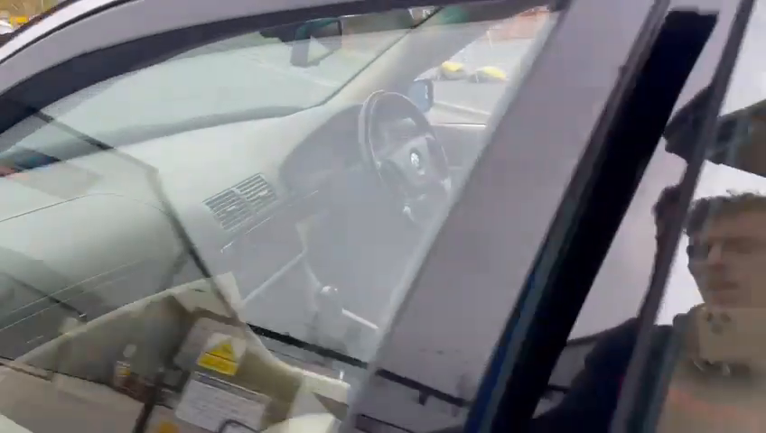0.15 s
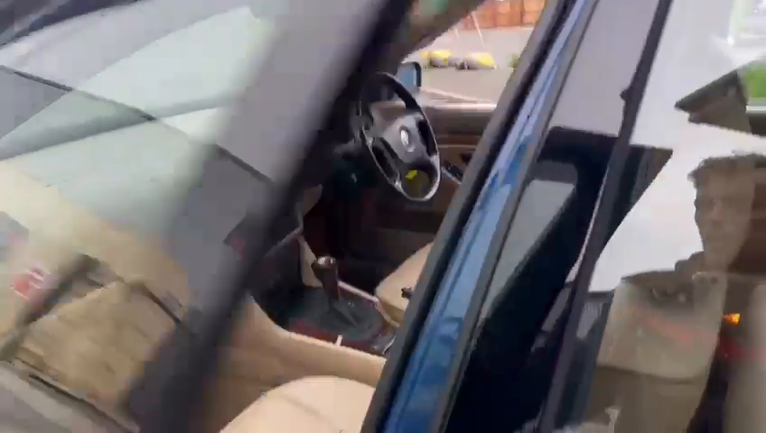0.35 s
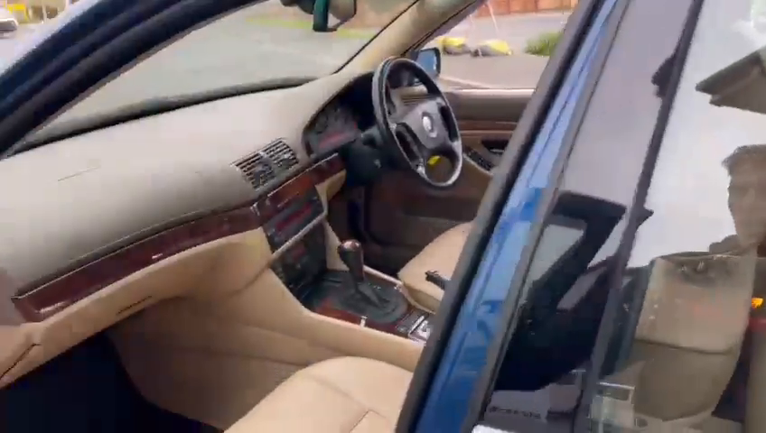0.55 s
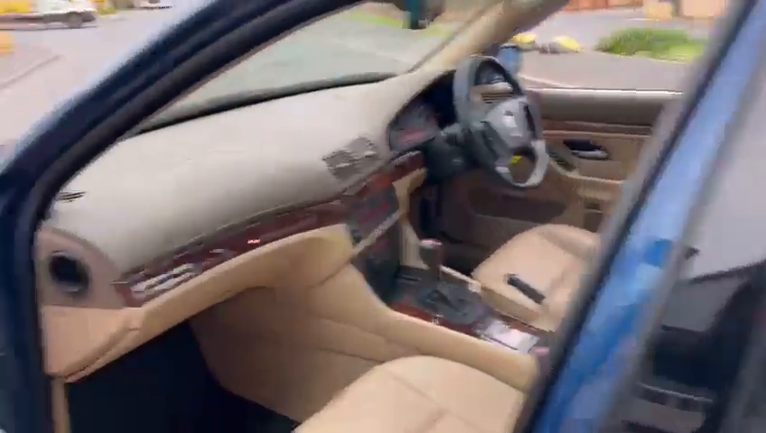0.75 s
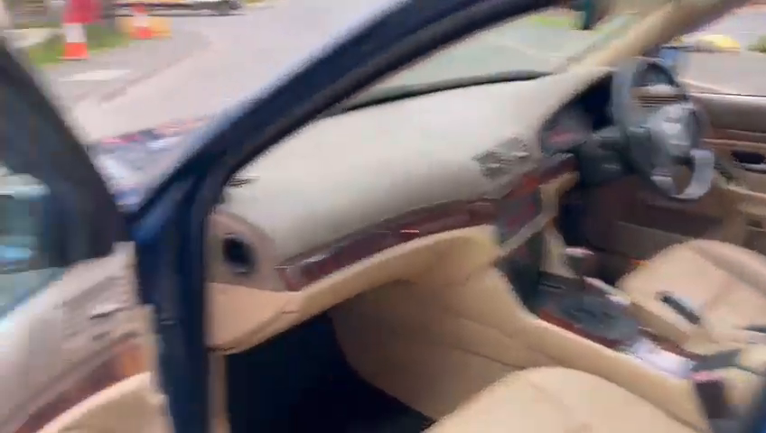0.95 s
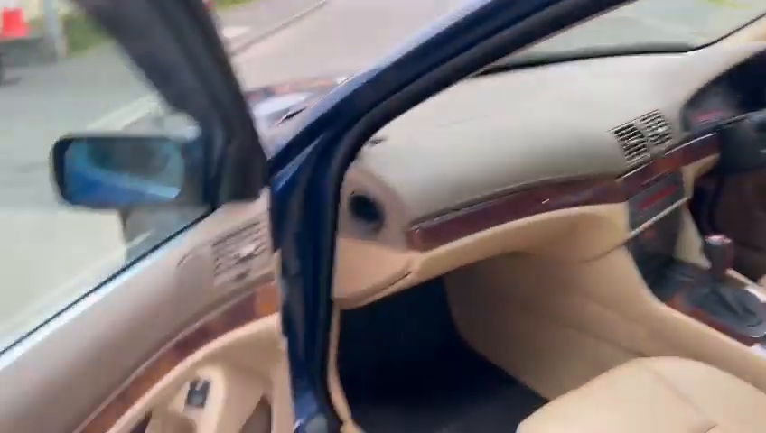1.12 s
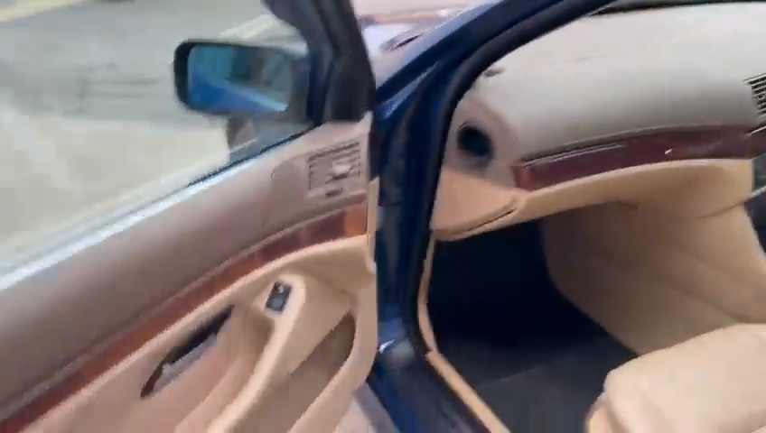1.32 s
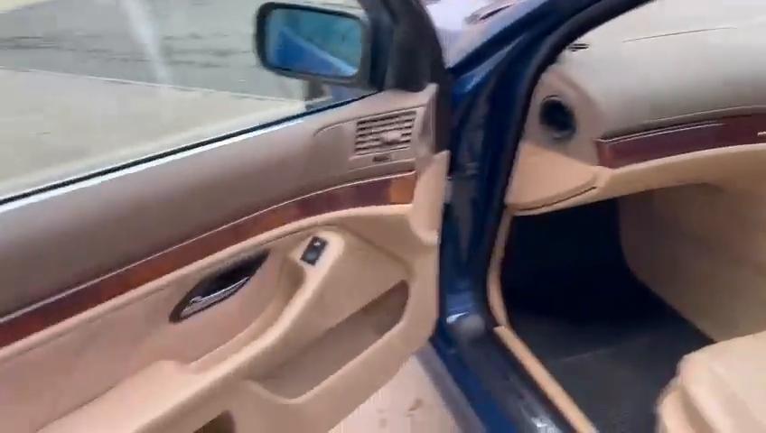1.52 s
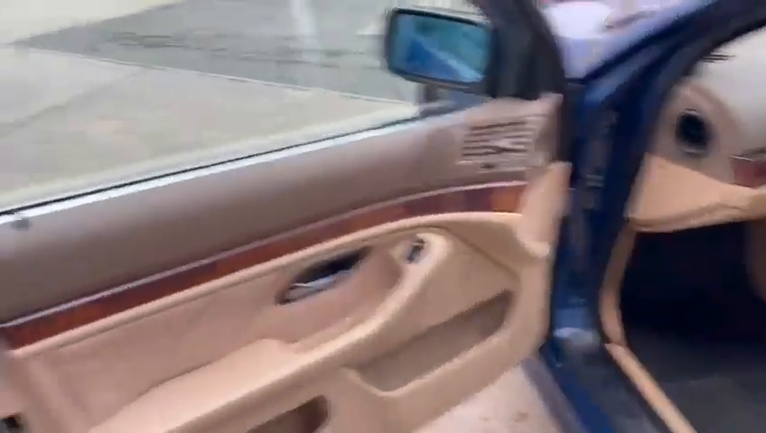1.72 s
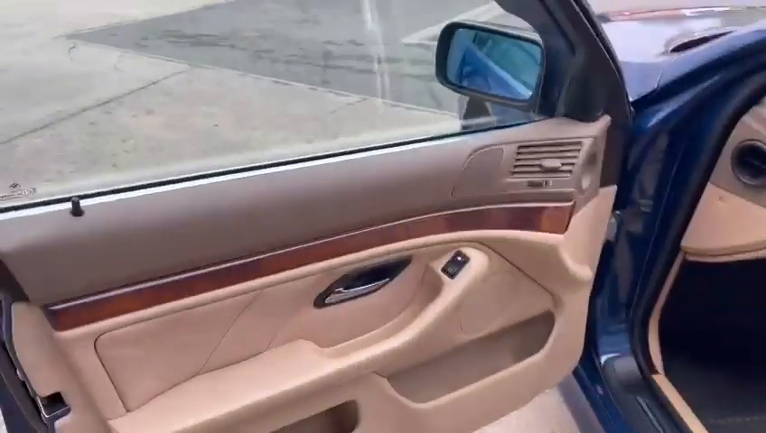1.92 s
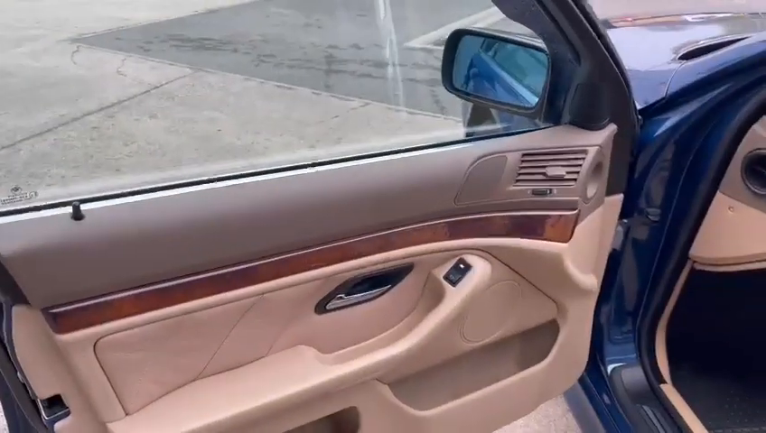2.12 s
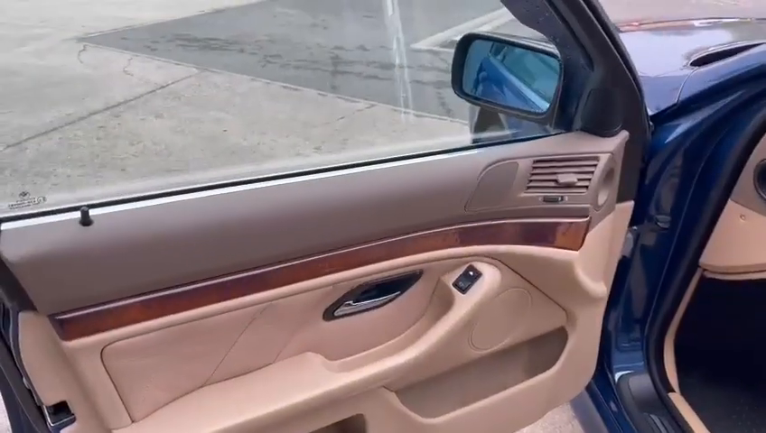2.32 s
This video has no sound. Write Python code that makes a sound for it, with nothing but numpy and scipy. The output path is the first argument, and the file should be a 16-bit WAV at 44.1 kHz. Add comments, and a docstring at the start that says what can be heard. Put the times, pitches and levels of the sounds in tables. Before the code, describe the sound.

A car door opens by hand, close up outdoors. At 0.0-0.15 s the handle clacks with a hollow plastic knock and the latch clicks. Dull low thumps and rumble crowd 0.2-0.5 s as seals peel. A sharp, bright metallic snap lands at 0.6 s, then movement fades. Faint traffic, hiss, weak hums and a barely audible thin tone at 1.05-1.6 s remain; a soft low bump near 1.7 s ends the swing.

```python
"""Car door opened by hand

Outdoors and close by, the handle clacks, the latch lets go, the seals peel off with dull thumps in the
door shell, the handle snaps back, and the door swings out to a soft stop. Struck parts are banks of
decaying modes; low noise follows the door's motion. Shaped noise gives distant traffic and hiss,
with wavering hums and a brief thin tone."""
import sys
import numpy as np
from scipy import signal
from scipy.fft import rfft, irfft
from scipy.io import wavfile
from scipy.ndimage import uniform_filter1d

SR = 44100
rng = np.random.default_rng(int(sys.argv[2]) if len(sys.argv) > 2 else 0)


def dump(signal):
    """Clip the signal to [-1, 1] and save it as 16-bit WAV at the path in sys.argv[1]."""
    limited = np.clip(np.atleast_2d(signal).T, -1, 1)
    pcm = np.round(limited * 32767).astype(np.int16)
    wavfile.write(sys.argv[1], SR, pcm)


N = 108662


def amp(db):
    """Turn decibels into an amplitude factor."""
    return 10 ** (np.asarray(db) / 20)


def rms_one(x):
    """Scale a signal to an rms of 1."""
    return x / np.sqrt(np.mean(x ** 2) + 1e-20)


def at_hz(points, hz):
    """Read a curve between its points, on a logarithmic pitch axis."""
    points_hz, values = np.array(points).T
    return np.interp(np.log(hz), np.log(points_hz), values)


def drift(rate_hz):
    """Slow random wander of rms 1: noise through two equal low-pass poles."""
    step, settle = 40, 2000  # samples per slow point, slow points dropped at the start
    pole = np.exp(-2 * np.pi * rate_hz * step / SR)
    noise = rng.standard_normal(N // step + settle + 2)
    slow = signal.lfilter([1], [1, -2 * pole, pole * pole], noise)[settle:]
    return np.interp(np.arange(N) / step, np.arange(len(slow)), rms_one(slow))


def ring(clicks, hz, t60):
    """One mode: a unit click starts a sine of height 1 that decays by 60 dB in t60 seconds."""
    radius = amp(-60 / (t60 * SR))
    turn = 2 * np.pi * hz / SR
    feedback = [1, -2 * radius * np.cos(turn), radius * radius]
    return signal.lfilter([0, np.sin(turn)], feedback, clicks + 1e-18)


def built_up_ring(clicks, hz, t60, build_s):
    """A soft blow: a first resonator swells the click, then the mode rings on."""
    soft_blow = ring(clicks, hz, build_s)
    return ring(soft_blow, hz, t60) * 14 / (build_s * SR)  # offsets the gain of the first resonator


def pitch_share(hz, centre_hz, spread_octaves):
    """Bell curve over pitch: how hard a blow drives a mode; the spread is two deviations."""
    return np.exp(-.5 * (np.log2(hz / centre_hz) / (.5 * spread_octaves)) ** 2)


def banded_noise(spectrum, patchy_db, rate_hz):
    """Stereo noise of rms 1 in quarter-octave bands, each with its own level, flicker and width."""
    # left-right likeness of the noise: (pitch [Hz], likeness [0 to 1])
    likeness_curve = [(60, 1), (130, 0.81), (260, 1), (550, 0.41), (1140, 0.45), (2380, 0.48), (4980, 0.79),
                      (10400, 0.42)]
    edges = 22 * 2 ** np.arange(0, 9.1, 1 / 4)
    white = rng.standard_normal((2, 2, N + 8000))  # neighbouring bands use different noise
    out = 0
    for k, (low, high) in enumerate(zip(edges, edges[1:])):
        band = signal.butter(2, [low, high], "band", fs=SR, output="sos")
        mid, side = signal.sosfilt(band, white[k % 2])[:, -N:]
        hz = np.sqrt(low * high)
        alike = np.clip(at_hz(likeness_curve, hz), -1, 1)
        gain = amp(at_hz(spectrum, hz) + patchy_db * drift(rate_hz))
        stereo = np.sqrt(1 + alike) * mid + np.sqrt(1 - alike) * side * [[1], [-1]]
        out = out + gain * stereo
    return rms_one(out)


def ports(x, lead):
    """A close source reaches two microphone ports with a phase lead that changes with pitch."""
    hz = np.fft.rfftfreq(N, 1 / SR) + 1
    turn = np.exp(.5j * at_hz(lead, hz))
    return irfft(rfft(x) * np.array([turn, 1 / turn]), N)


def street():
    """Distant traffic and microphone hiss: wide noise whose bands flicker independently."""
    # long-term colour of the background: (pitch [Hz], relative density [dB per Hz])
    street_tone = [(25, -25), (45, 13.5), (70, -56.5), (130, 0.5), (220, -4), (290, -6.5), (350, -4),
                   (480, -6), (600, -10), (800, -12), (1400, -16), (2100, -17.5), (3000, -21.5),
                   (3700, -29), (4200, -26.5), (6500, -23), (8500, -22), (9700, -8)]
    return amp(-40) * banded_noise(street_tone, patchy_db=2.0, rate_hz=16.3)


def tones():
    """Noise through paired resonators makes wavering hums; a sine fades in and out as a thin tone."""
    # wavering narrow bands: (pitch [Hz], nominal width [Hz], level [dB])
    hum_bands = [(286.2, 25, -50), (471.6, 4.5, -54.5), (3627, 450, -63)]
    whine_hz, whine_db, whine_start_s, whine_end_s = 2185, -59, 1.05, 1.6
    t = np.arange(N) / SR
    hums = 0
    for hz, width, db in hum_bands:
        t60 = 3.0 / width
        narrow = ring(ring(rng.standard_normal(N), hz, t60), hz, t60)
        hums = hums + amp(db) * rms_one(narrow)
    on = np.clip(np.minimum(t - whine_start_s, whine_end_s - t) / 0.007, 0, 1)  # 7 ms fades
    whine = amp(whine_db + drift(8.5)) * on * np.sin(2 * np.pi * whine_hz * t)
    return hums + whine


def rumble():
    """Low noise of the moving door and its peeling seals, its level following the motion."""
    # loudness of the movement: (time [s], level [dB])
    motion = [(0, -26), (0.101, -30.5), (0.182, -34), (.3, -21), (0.401, -27.5), (0.498, -29), (.58, -41.5),
              (0.658, -30.5), (.8, -41), (1.05, -54.5), (1.2, -54), (1.4, -44), (1.6, -41), (1.749, -37),
              (1.848, -48.5), (2.46, -49.5)]
    # colour of the rumble: (pitch [Hz], relative density [dB per Hz])
    rumble_tone = [(30, -19), (60, -3.5), (130, 3), (250, -7), (450, -9), (650, -63)]
    s, db = np.transpose(motion)
    level = amp(np.interp(np.arange(N) / SR, s, db))
    return level * banded_noise(rumble_tone, patchy_db=0.0, rate_hz=4.7)[0]


def thumps():
    """Soft blows build up in the door shell and drive the modes near their favoured pitch hardest."""
    # dull thumps: (time [s], relative level [dB], favoured pitch [Hz], spread of pitch [octaves])
    thump_events = [(.018, -9.5, 445, 0.43), (.024, -8, 123, 1.1), (0.041, -15.5, 71, 0.97),
                    (0.067, -19, 186.7, 0.49), (0.119, -24, 107, 0.52), (0.154, -20.5, 298, 1.3),
                    (0.187, -18.5, 103, 0.3), (0.208, -6.5, 88.6, 0.36), (0.249, -14, 400, 1.06),
                    (0.263, -6, 120, 1.12), (0.299, -9.5, 444, 1.1), (0.312, -7, 178, 0.87),
                    (0.3142, -18.5, 603, 0.21), (.364, -23, 600, 0.72), (.426, -30.5, 685, 0.38),
                    (0.342, -15.5, 243, 0.8), (0.362, -12, 140, 0.48), (0.384, -26, 278, 0.92),
                    (.419, -13, 229, 0.66), (.43, -11.5, 343, 1.24), (0.456, -20, 160, 0.26),
                    (.475, -17.5, 192, 0.43), (0.486, -9.5, 75, 0.88), (0.517, -28, 382, 0.3),
                    (.619, -15.5, 568, 0.37), (0.63, -14, 300, 0.62), (.633, -20, 534, 0.32),
                    (0.652, -17.5, 172, 0.46), (0.692, -24, 170, 0.64), (0.747, -34.5, 194, 0.29),
                    (0.852, -31, 189, 0.28), (0.908, -35, 75, 0.54), (1.132, -17, 81, 0.14),
                    (1.189, -36.5, 81, 0.5), (1.253, -27.5, 90, 0.69), (1.668, -29.5, 668, 0.34),
                    (1.748, -38.5, 647, 0.21), (1.72, -16.5, 124.3, 0.74), (1.742, -24, 195, 1.6)]
    # modes of the door shell: (pitch [Hz], relative level [dB], decay by 60 dB [s])
    shell_modes = [(45, -13.5, .25), (72.06, 5, 0.2), (108.4, 3, 0.09), (144, 2, 0.055), (176.6, 5, 0.079),
                   (224.3, 5, 0.099), (280, 7.5, 0.034), (349, 2.5, 0.055), (444.6, -1.5, 0.06),
                   (564, -2, 0.038), (686, 5.5, 0.015), (890, -5.5, 0.0047)]
    build_cycles, top_hz, scatter_db = 2.2, 770, 2
    s, db, centre, spread = np.transpose(thump_events)
    scatter = scatter_db * rng.standard_normal((len(s), len(shell_modes)))
    out = 0
    for k, (hz, mode_db, t60) in enumerate(shell_modes):
        share = pitch_share(hz, centre, spread) / spread  # a wide spread drives each mode less
        blows = np.zeros(N)
        np.add.at(blows, (s * SR).astype(int), share * amp(db + mode_db - 6.5 + scatter[:, k]))
        out = out + built_up_ring(blows, hz, t60, build_cycles / hz)
    return signal.sosfilt(signal.butter(7, top_hz, fs=SR, output="sos"), out)


def handle_knock():
    """One hollow knock of the plastic handle: a blow swells over milliseconds in the trim modes."""
    # modes of the plastic trim: (pitch [Hz], relative level [dB], decay by 60 dB [s])
    trim_modes = [(543.4, 5.5, 0.031), (888, 1, 0.014), (994, -14, 0.019), (1220, -8, 0.0088),
                  (1346, -20.5, 0.015), (1530, -18, 0.04), (1860, -17, 0.014), (2090, -30, 0.033),
                  (2300, -19.5, 0.0067)]
    knock_s, knock_db, build_s = .0545, -4, 0.016
    blow = np.zeros(N)
    blow[int(knock_s * SR)] = amp(knock_db)
    return sum(amp(db) * built_up_ring(blow, hz, t60, build_s) for hz, db, t60 in trim_modes)


def contact_rattle(t, length):
    """A brief stereo burst of random tiny contacts that rises fast and dies away; energy 1 per ear."""
    contacts_per_s, width_db = 9000, -14
    hits = rng.standard_normal((2, len(t))) * (rng.random(len(t)) < contacts_per_s / SR)
    mid, side = hits * np.exp(-2 * t / length) * np.minimum(5 * t / length, 1)
    mid[int(.2 * length * SR)] = 1  # one sure contact where the rise ends
    side = amp(width_db) * side
    rattle = np.array([mid + side, mid - side])
    return rattle / np.linalg.norm(rattle, axis=1, keepdims=True)


def clicks():
    """Rattling contacts of handle and latch ring the metal modes, with a bare bright crack on top."""
    # metal clicks: (time [s], relative level [dB], rattle length [s], favoured pitch [Hz],
    # spread of pitch [octaves], bare crack [dB], left over right [dB])
    click_events = [(0.0146, -15.5, 0.005, 1660, 1.14, 8.5, 0), (0.1445, -25, 0.012, 1610, 0.95, 16.5, 2),
                    (.577, -16.5, 0.0042, 2415, 0.18, -9, -1), (.606, -12.5, 0.02, 7440, 1.5, -17, 1.5),
                    (0.611, -7.5, 0.0083, 2520, 0.74, -21, 1), (0.6148, -2, 0.0016, 3130, 0.62, 5, 0),
                    (0.618, -13.5, 0.0018, 2150, 0.91, 3, 11.5), (0.619, -17, 0.018, 1100, 1.46, 7, -1),
                    (0.638, -34.5, 0.085, 2310, 1.8, 19, -5), (1.6675, -40.5, 0.0014, 5000, 1.1, 25, 4)]
    # modes of the latch metal: (pitch [Hz], relative level [dB], decay by 60 dB [s])
    latch_modes = [(780, 5, 0.014), (904, 6, 0.017), (1175, -1.5, 0.0091), (1360, -2.5, 0.016),
                   (1700, -2, 0.0079), (2160, -5, 0.016), (2595, -1.5, 0.0058), (2950, 2.5, 0.0036),
                   (3386, 4.5, 0.0038), (3690, -3.5, 0.01), (4400, -3, 0.0061), (5110, -1, 0.002),
                   (6060, -12, 0.009), (8720, 5, 0.0028)]
    # left port ahead of right for the handle's snap: (pitch [Hz], phase lead [rad])
    snap_lead = [(700, 0.79), (1200, 1.32), (1800, 0.12), (3450, 1.24), (6400, .1), (7700, 0.86)]
    snap_start_s, snap_end_s = .6, .7  # the handle snaps back
    scatter_db, detune = 1.0, .03  # modes shift a little as the parts move, as a share of pitch
    crack_filter = signal.butter(1, 1200, "high", fs=SR, output="sos")
    t = np.arange(int(.25 * SR)) / SR
    plain, snap = np.zeros((2, N)), np.zeros((2, N))
    for s, db, length, centre, spread, crack_db, pan_db in click_events:
        rattle = contact_rattle(t, length)
        sound = amp(crack_db) * signal.sosfilt(crack_filter, rattle)
        level_scatter, pitch_scatter = rng.standard_normal((2, len(latch_modes)))
        for k, (hz, mode_db, t60) in enumerate(latch_modes):
            gain = pitch_share(hz, centre, spread) * amp(mode_db + scatter_db * level_scatter[k])
            mode = ring(rattle, hz * (1 + detune * pitch_scatter[k]), t60)
            sound = sound + (-1) ** k * gain * mode  # polarity alternates from mode to mode
        i = int(s * SR)
        layer = snap if snap_start_s < s < snap_end_s else plain
        layer[:, i:i + len(t)] += amp(db) * sound * amp([[pan_db / 2], [-pan_db / 2]])
    return plain + ports(snap, snap_lead)


def bodywork(x):
    """Scatter off the bodywork: a dense, dull, quickly dying noise tail, partly its own in each ear."""
    t60_s, tail_db, top_hz, width_db = 0.1, -7.5, 3070, -3
    t = np.arange(int(.3 * SR)) / SR
    dull = signal.butter(1, top_hz, fs=SR, output="sos")
    mid, side = signal.sosfilt(dull, rng.standard_normal((2, len(t))))
    tail = (mid + amp(width_db) * side * [[1], [-1]]) * amp(-60 * t / t60_s)
    tail = tail / np.sqrt(np.sum(tail ** 2) / 2)  # mean energy of 1 per ear
    return x + amp(tail_db) * signal.fftconvolve(x, tail, axes=1)[:, :N]


def scene():
    """Lay the door's parts over the street and the tones."""
    # first port ahead of second for close sources: (pitch [Hz], phase lead [rad])
    close_lead = [(30, 0.8), (150, 0.33), (500, 0.78), (1000, 0.81)]
    background = street() + tones()
    # swapped ports: the shell reaches the right one first, and is a touch louder on the left
    shell = ports(thumps() + rumble(), close_lead)[::-1] * amp([[.3], [-.3]])
    knock = ports(handle_knock(), close_lead)
    share = amp(-4)  # the knock reaches the bodywork more weakly than the clicks
    metal_and_knock = bodywork(clicks() + share * knock) + (1 - share) * knock
    return background + shell + metal_and_knock


def record(dry):
    """Bass cut, a gentle gain control that sinks the background under loud moments, steep top cut."""
    bass_cut_hz, top_stop_hz = 44, 10050  # everything above top_stop_hz is 70 dB down
    squeeze_from_db, squeeze_share, release_db_per_s = -26.5, 0.15, 21.5
    smooth = 882  # samples, 20 ms
    x = signal.sosfilt(signal.butter(2, bass_cut_hz, "high", fs=SR, output="sos"), dry)
    level = 10 * np.log10(uniform_filter1d(np.mean(x ** 2, axis=0), size=smooth) + 1e-12)
    # the held level jumps up with the sound and falls at the release rate
    ramp = release_db_per_s * np.arange(N) / SR
    held = np.maximum.accumulate(level + ramp) - ramp
    excess = uniform_filter1d(np.maximum(held - squeeze_from_db, 0), size=smooth)
    x = x * amp(-squeeze_share * excess)
    return signal.sosfilt(signal.cheby2(16, 70, top_stop_hz, fs=SR, output="sos"), x)


dry = scene()
out = record(dry)
dump(out)
```